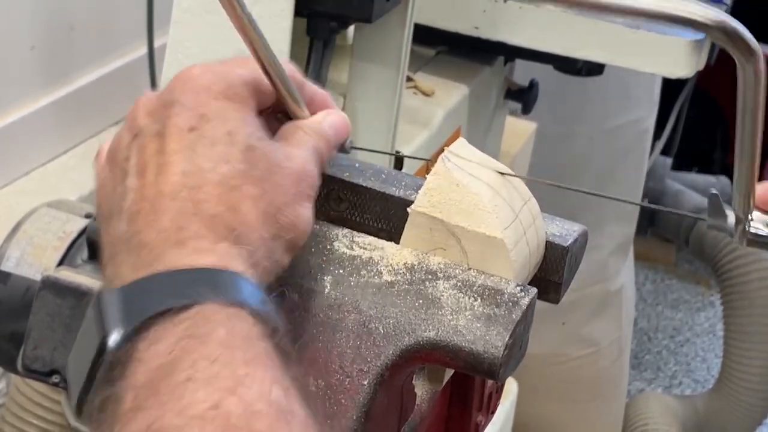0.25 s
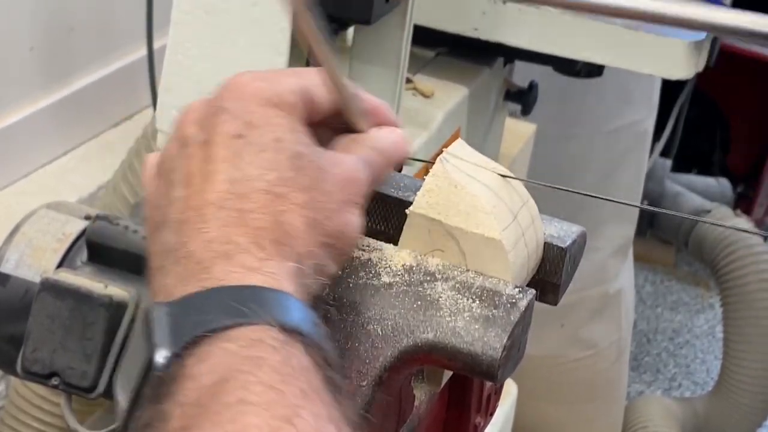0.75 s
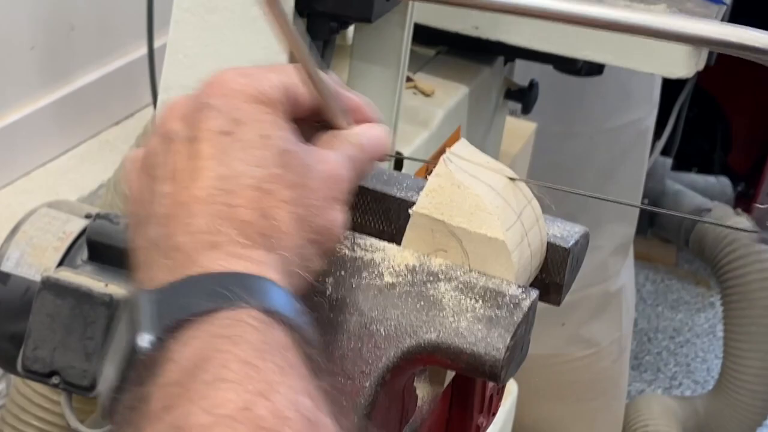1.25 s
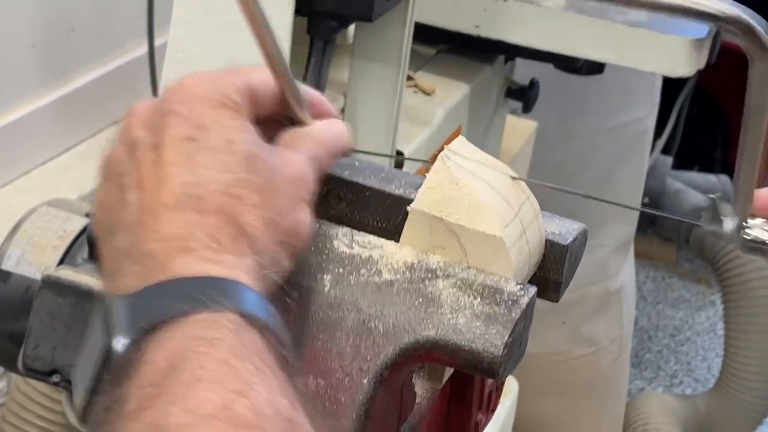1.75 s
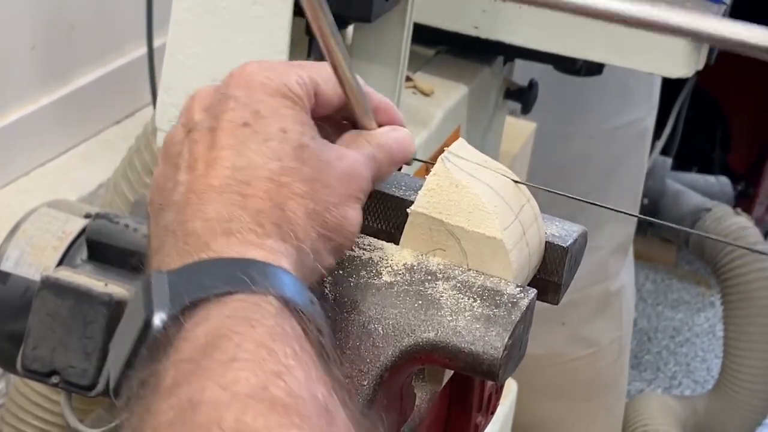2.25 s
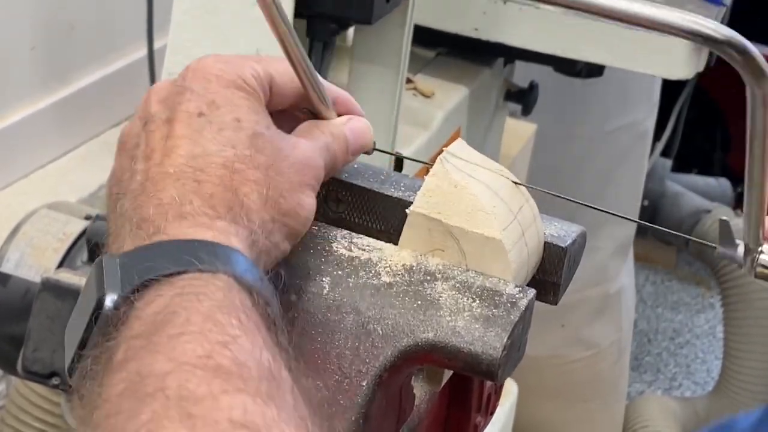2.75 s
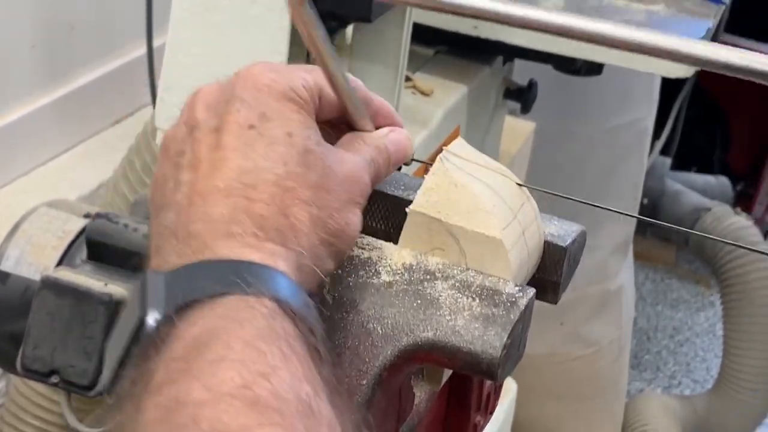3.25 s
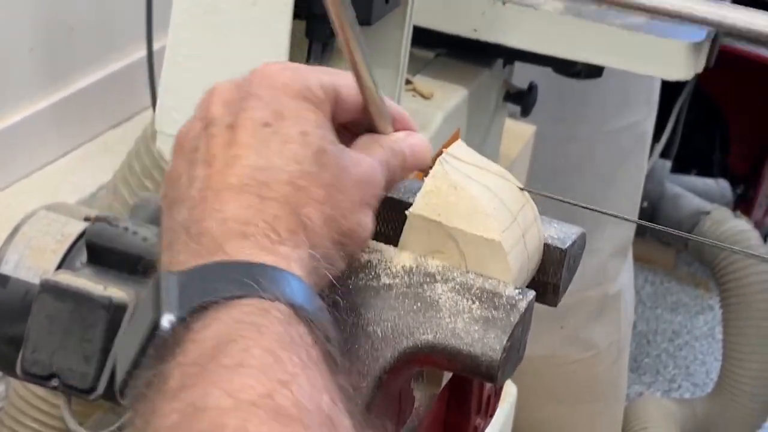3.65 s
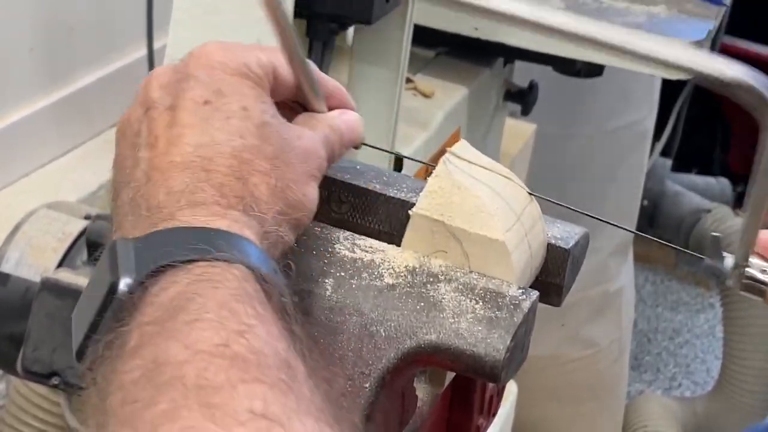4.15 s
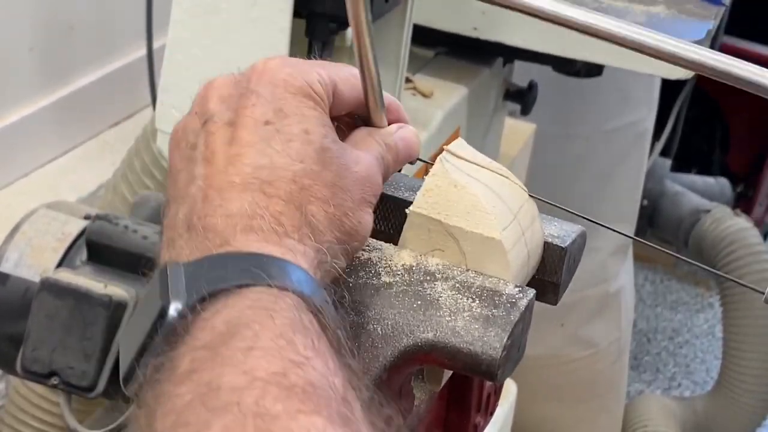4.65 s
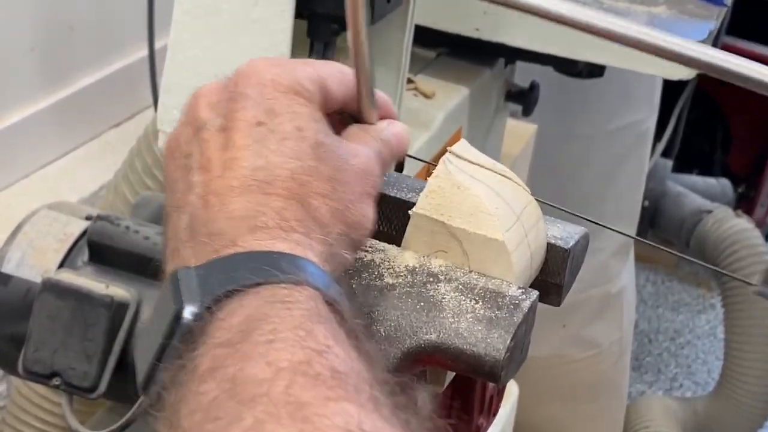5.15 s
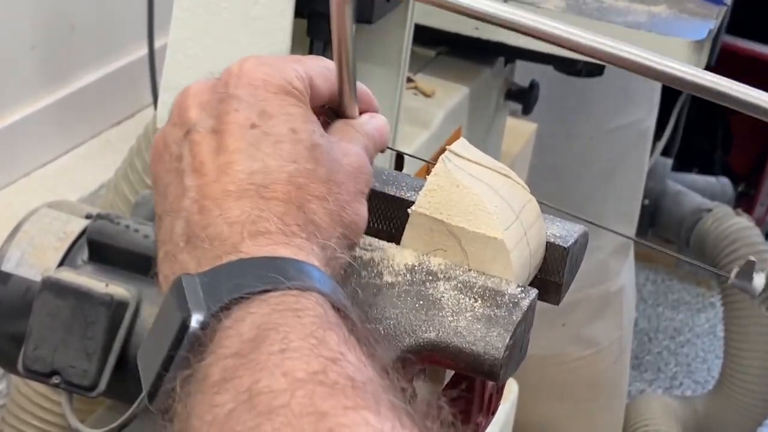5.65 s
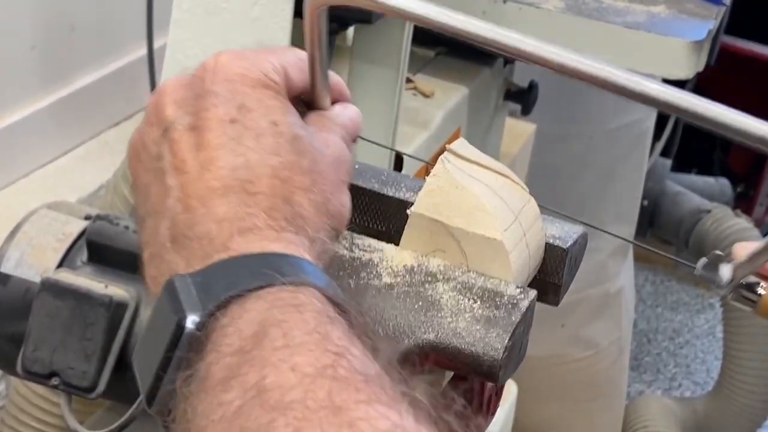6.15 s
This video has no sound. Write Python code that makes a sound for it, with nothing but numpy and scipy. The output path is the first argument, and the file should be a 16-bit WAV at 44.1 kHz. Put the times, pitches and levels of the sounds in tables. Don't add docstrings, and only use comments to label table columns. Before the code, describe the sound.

A hand coping saw rasps through softwood in quick, even back-and-forth strokes, ringing metallically, then slows into short, hesitant scrapes and snaps.

```python
import sys
import numpy as np
from scipy import signal
from scipy.fft import rfft, irfft, next_fast_len
from scipy.io import wavfile
from scipy.ndimage import uniform_filter1d, map_coordinates

SR = 44100
rng = np.random.default_rng(int(sys.argv[2]) if len(sys.argv) > 2 else 0)


def dump_mix(stems):
    frames = np.atleast_2d(stems).T
    limited = np.clip(frames, -1, 1)
    pcm = np.round(limited * 32767).astype(np.int16)
    wavfile.write(sys.argv[1], SR, pcm)


def makeup_ratio(level_db):
    decades = np.asarray(level_db, float) / 20
    return 10 ** decades


N = 282183

# (centre [s], length [s], first rate [Hz], last rate [Hz], level [dB])
TOOTH_ROWS = [(0.205, 0.066, 397.5, 113, -23), (0.513, 0.067, 419.6, 119, -25.5),
              (0.815, 0.069, 434.4, 104, -25.5), (1.115, 0.068, 435.5, 106.3, -19),
              (1.357, .03, 283, 315, -31), (1.421, 0.072, 441.2, 86, -19.5), (1.696, .035, 239, 335, -25),
              (1.752, 0.069, 425.5, 111, -29), (2.074, 0.04, 346, 240, -29.5), (2.179, .03, 238, 310, -28),
              (2.346, .025, 255, 300, -39), (2.399, 0.055, 380, 154, -31.5),
              (2.712, 0.052, 289.5, 251, -28.5), (3.007, .025, 268, 320, -33),
              (3.352, .03, 255, 310, -32.5), (3.669, 0.026, 256.5, 302, -30.5),
              (3.737, 0.062, 439.4, 135.4, -23), (4.026, 0.038, 270, 323, -27),
              (4.382, 0.043, 313, 279, -27.5), (5.571, 0.039, 293, 322, -37), (0.171, 0.026, 290, 387, -39),
              (0.32, 0.052, 282, 324, -32.5), (0.463, 0.028, 285, 323, -33),
              (0.764, 0.049, 339, 430, -31.5), (0.923, 0.058, 298, 318, -31.5),
              (1.061, 0.046, 291, 430, -37), (1.38, 0.027, 322, 442, -43), (1.476, 0.043, 272, 264, -40),
              (1.576, .04, 266, 293, -37), (1.726, 0.038, 295, 398, -32), (2.015, .03, 284, 320, -37),
              (2.239, .05, 255, 328, -39.5), (2.518, 0.045, 292, 258, -34), (3.046, .05, 332, 434, -39),
              (2.043, 0.047, 334, 435, -40), (3.392, 0.066, 297, 318, -37), (3.841, .025, 310, 317, -32),
              (3.884, 0.042, 325, 304, -32), (4.079, 0.049, 306, 310, -39), (5.016, .04, 253, 203, -32.5),
              (6.087, 0.046, 300, 281, -45)]


def unit(x):
    return x / np.sqrt(np.mean(x ** 2) + 1e-20)


def along(points, hz):
    f, v = np.transpose(points)
    return np.interp(np.log(hz + 1), np.log(f + 1), v)


def curves(rows):
    s, *cols = np.transpose(rows)
    return [np.interp(np.arange(N) / SR, s, c) for c in cols]


def wobble(rate_hz):
    coarse = np.arange(0, N + 16, 16)
    knots = rng.standard_normal(int(N * rate_hz / SR) + 4)
    return np.interp(np.arange(N), coarse, map_coordinates(knots, [coarse * rate_hz / SR]))


def filtered(x, response):
    m = next_fast_len(N + SR // 2)
    return irfft(rfft(x, m) * response(np.fft.rfftfreq(m, 1 / SR)), m)[..., :N]


def coloured(x, spectrum):
    return filtered(x, lambda hz: makeup_ratio(along(spectrum, hz)))


def ringing(x, modes):
    out = 0
    for k, (hz, width_hz, db) in enumerate(modes):
        r = np.exp(-np.pi * width_hz / SR)
        poles = [1, -2 * r * np.cos(2 * np.pi * hz / SR), r * r]
        out = out + (-1) ** k * makeup_ratio(db) * (1 - r) * signal.lfilter([1, 0, -1], poles, x)
    return out


def grit(grain_db, rate_hz):
    return unit(makeup_ratio(grain_db * wobble(rate_hz)) * rng.standard_normal(N))


def mottled(x, patchy_db):
    z = signal.stft(x, nperseg=512)[2]
    field = uniform_filter1d(rng.standard_normal(z.shape), size=7, axis=0)
    field = uniform_filter1d(field, size=6, axis=1)
    return signal.istft(z * makeup_ratio(patchy_db * unit(field)), nperseg=512)[1][:N]


def add(track, s, piece):
    part = track[round(s * SR):][:len(piece)]
    part += piece[:len(part)]


def strokes(column, peak, start_db, end_db, square):
    # (start [s], length [s], blade ring [dB], fibre hiss over it [dB], block [dB])
    pushes = [(0.139, 0.066, -32, -12, -39), (0.432, 0.082, -33, -10, -36.5),
              (0.728, 0.091, -29.5, -12.5, -35), (1.029, 0.088, -31, -12.5, -37.5),
              (1.343, 0.074, -28, -14, -33), (1.678, 0.072, -34, -9, -35), (1.995, 0.09, -34, -11, -39),
              (2.324, 0.083, -37, -7, -39), (2.658, 0.078, -42, -6.5, -37), (2.985, 0.093, -34, -9, -38.5),
              (3.33, 0.08, -37, -7.5, -36.5), (3.65, 0.09, -34, -7.5, -37.5),
              (3.993, 0.091, -38.5, -6, -36), (4.321, 0.099, -40, -4.5, -38.5)]
    pulls = [(-0.04, 0.094, -34.5, -11.5, -38), (0.252, 0.13, -40.5, -10, -39.5),
             (0.566, 0.1, -36.5, -12, -40), (0.867, 0.11, -37, -11, -38), (1.172, 0.11, -37.5, -10.5, -40),
             (1.487, 0.11, -38.5, -11, -37.5), (1.803, 0.12, -40.5, -10, -42),
             (2.138, 0.11, -39.5, -9, -38), (2.475, 0.11, -42, -7, -39.5), (2.802, 0.11, -43.5, -6, -41),
             (3.134, 0.12, -42.5, -5.5, -43.5), (3.471, 0.1, -40.5, -6, -39.5),
             (3.804, 0.11, -40, -6.5, -37.5), (4.143, 0.12, -43.5, -5.5, -41.5),
             (4.492, 0.092, -45.5, -1.5, -44)]
    drags = [(4.622, 0.083, -67, 9, -59), (4.808, 0.065, -51, 0.5, -49), (4.957, 0.099, -39.5, -7, -42),
             (5.112, 0.11, -50, -4, -48), (5.267, 0.087, -43.5, -6, -45.5),
             (5.402, 0.082, -49, -4.5, -53.5), (5.509, 0.1, -45.5, -8, -47.5),
             (5.644, 0.089, -53.5, -1.5, -54.5), (5.761, 0.12, -54, 0, -55.5),
             (5.919, 0.093, -54.5, -4.5, -59), (6.041, 0.094, -46.5, -6, -51.5),
             (6.163, 0.1, -53, -13, -71), (6.33, 0.21, -59, 6.5, -54.5)]
    t, power = np.arange(0, N + 64, 64) / SR, 0
    for row in pushes + pulls + drags:
        u = 2 * ((t - row[0]) / row[1] - peak)
        loss_db = np.where(u < 0, start_db, end_db) * np.abs(u) ** square
        power = power + makeup_ratio(column(row) - loss_db) ** 2
    return np.interp(np.arange(N) / SR, t, np.sqrt(power))


def catches():
    # (time [s], surge [dB])
    jumps = [(0.014, -1), (.281, 7), (0.336, 8), (0.439, 6), (.481, 3), (0.607, 0.5), (.709, 2), (.743, -1),
             (.904, 2), (1.024, 5), (1.063, 2), (1.194, -3), (1.278, 7), (1.345, -4), (1.368, 1),
             (1.547, 5), (1.682, 10.5), (1.828, 10.5), (1.875, 2), (1.987, 3), (2.038, 4.5), (2.182, 7),
             (2.331, 2), (2.364, 2.5), (2.501, 4), (2.827, -0.5), (3.017, -2), (3.327, 8), (3.464, 6.5),
             (3.656, -3), (3.695, 6.5), (3.815, 3), (4.007, 8), (4.324, 2), (4.522, -5), (4.814, 9),
             (5.022, -3), (5.262, 10), (5.53, -3), (5.81, -6), (6.046, 9), (6.19, 12)]
    hold_s, surge_s = 0.0027, 0.0057
    surge_db, u = np.zeros(N), np.arange(-SR // 20, SR // 10) / SR
    shape = np.where(u < 0, -0.7 * np.exp(-np.abs(u) / hold_s), np.exp(-np.abs(u) / surge_s))
    for s, db in jumps:
        start = max(s + u[0], 0)
        add(surge_db, start, db * shape[round((start - s - u[0]) * SR):])
    return makeup_ratio(surge_db)


def snaps():
    # (time [s], peak [dB], ring [dB], t60 [s])
    releases = [(4.407, -26, -30.5, 0.02), (4.6894, -54, -5, 0.025), (4.9721, -26, -16.5, 0.018),
                (4.983, -39.5, -15, 0.13), (5.4076, -49, -15.5, 0.052), (5.6343, -25, -24, 0.042),
                (5.9001, -35.5, -16, 0.056), (6.1726, -45, -9, 0.042), (6.315, -40.5, -8, 0.02),
                (6.352, -46, -9, 0.021), (6.39, -46, -12, 0.041)]
    hiss, ring = np.zeros((2, N))
    u = np.arange(SR // 8) / SR
    for s, db, ring_db, t60_s in releases:
        noise = np.diff(rng.standard_normal(len(u) + 1))
        snap = makeup_ratio(-60 * u / t60_s) * (1 - np.exp(-u / 0.00097)) * noise
        add(hiss, s, makeup_ratio(db - 6.5) * snap)
        add(ring, s, makeup_ratio(db + ring_db + 24.5) * snap)
    return hiss, ring


def blade():
    # (frequency [Hz], level [dB per Hz])
    fibre_spectrum = [(700, -120), (1300, -11.5), (1900, -2), (2800, -5.5), (4000, 0), (4600, -6),
                      (6000, -3), (8000, -3), (9300, -5.5), (11000, -1.5), (13000, -7), (16000, -3)]
    # (frequency [Hz], width [Hz], shallow cut [dB], deep cut [dB], frame turned [dB])
    frame_modes = [(865, 110, -32, -28.5, -30.5), (1128, 106, -33.5, -29.5, -62),
                   (1406, 25, -21.5, -19, -24), (1704, 33, -19.5, -25, -23), (2136, 177, -15.5, -18, -12.5),
                   (2210, 63, -9, -8, -6.5), (2282.4, 27.7, 0.5, -0.5, -2), (2322, 47.6, -1.5, -2, -2.5),
                   (2390, 73, -2, -3.5, -4), (2394, 166, -15, -21.5, -17.5),
                   (3108, 26, -16.5, -10.5, -15.5), (3346, 88, -12.5, -14, -16), (3462, 32, -8, -6, -23),
                   (3606, 75, -15.5, -13.5, -14), (4460, 52, -43, -33, -28), (5200, 86, -12.5, -12.5, -24),
                   (5390, 35, -12, -22, -12), (5513, 117, -26, -15, -22), (7010, 90, -25, -22.5, -23),
                   (7320, 48, -24, -18.5, -23), (7800, 190, -20, -31, -19.5),
                   (8660, 170, -29.5, -27.5, -31), (10480, 99, -36, -21, -31)]
    depths_s = [1.3, 1.9, 4.7, 5.1]
    # (time [s], half length [s], gain [dB])
    bows = [
        (5.566, 0.041, 2),
        (5.836, 0.032, 11.5),
        (6.07, 0.032, 12),
    ]
    tearing = grit(grain_db=0.65, rate_hz=740) * makeup_ratio(0.46 * wobble(40) + 0.58 * wobble(130)) * catches()
    ring = tearing * strokes(lambda row: row[2], peak=0.44, start_db=12.9, end_db=9.64, square=1.59)
    hiss = tearing * strokes(lambda row: row[2] + row[3] + 2, peak=0.55, start_db=8.9, end_db=11.1, square=1.58)
    snap_hiss, snap_ring = snaps()
    ring, hiss = ring + snap_ring, hiss + snap_hiss
    rasp = mottled(coloured(hiss, fibre_spectrum), patchy_db=1.33) / np.std(coloured(tearing, fibre_spectrum))

    t, rung = np.arange(N) / SR, 0
    bow_db = sum(db * np.exp(-((t - s) / half_s) ** 2) for s, half_s, db in bows)
    sway_db = np.interp(t, depths_s, [1.77, 1.7, 1.64, 2.4])
    for k, (hz, width_hz, shallow, deep, turned) in enumerate(frame_modes):
        depth_db = np.interp(t, depths_s, [shallow, deep, deep, turned])
        strength = makeup_ratio(22.5 + bow_db * (1500 < hz < 2250) + depth_db + sway_db * wobble(14))
        rung = rung + (-1) ** k * ringing(strength * ring, [(hz, width_hz, 0)])
    drift_s = .0004 * wobble(7)
    return rasp + map_coordinates(rung, [np.arange(N) + drift_s * SR], order=3)


def tooth_rows():
    # (frequency [Hz], width [Hz], level [dB])
    wood_modes = [(120, 23, -3), (242, 62, -11.5), (321, 109, -2), (420.5, 46, -5), (682, 58, -2),
                  (990, 500, -11)]
    spacing_share, scatter_db = .05, 1.3
    teeth, locked = np.zeros((2, N))
    uneven = wobble(150)
    for s, length_s, first_hz, last_hz, db in TOOTH_ROWS:
        u = np.linspace(0, 1, round(length_s * SR))
        spacing = 1 + spacing_share * uneven[round(s * SR):][:len(u)]
        rate_hz = (first_hz + (last_hz - first_hz) * u) * spacing
        turn = 2 * np.pi * np.cumsum(rate_hz) / SR + rng.uniform(0, 6.7)
        sharpness = np.clip(2.04 + 0.08 * (db + 17.5), .3, 3)
        pulses = np.exp(sharpness * (np.cos(turn) - 1))
        swell = makeup_ratio(db + 9.5) * np.sin(np.pi * u ** 1.185) ** 1.2
        bite = makeup_ratio(scatter_db * uneven[round(s * SR) // 2:][:len(u)])
        add(teeth, s - .54 * length_s, swell * bite * 0.34 * unit(pulses - pulses.mean()))
        add(locked, s - length_s / 2, np.sin(np.pi * u) ** 0.58)
    return ringing(teeth, wood_modes), np.minimum(locked, 1)


def stalls():
    return [(s + length_s / 2, db) for s, length_s, _, last_hz, db in TOOTH_ROWS if last_hz < 160]


def drumming(locked):
    # (frequency [Hz], level [dB per Hz])
    block_spectrum = [(88, -51), (150, -22), (222, -13.5), (258, 1), (290, -4.5), (322, 0), (400, -12),
                      (470, -29), (527, -24), (592, -23.5), (691, -23.5), (777, -35), (982, -31),
                      (1090, -26), (1200, -52), (1300, -30), (1690, -45), (2860, -120)]
    load = strokes(lambda row: row[4], peak=0.47, start_db=15.5, end_db=3.4, square=1.8)
    rumble, u = np.zeros(N), np.arange(SR // 5) / SR
    for s, db in stalls():
        add(rumble, s - .02, makeup_ratio(db - 11.5 - 60 * u / .3) * np.minimum(u / 0.025, 1))
    contact = grit(grain_db=3.0, rate_hz=90)
    force = np.hypot(load * makeup_ratio(-3 - 2.1 * locked), rumble)
    return coloured(force * contact, block_spectrum) / np.std(coloured(contact, block_spectrum))


def bench():
    # (frequency [Hz], level [dB per Hz])
    bench_spectrum = [(15, -61), (25, -24), (100, -2), (118, 1.5), (156, -15.5), (190, -8), (250, -19),
                      (420, -120)]
    # (time [s], bench over block [dB])
    arm_weight = [(0, -8), (2, -7), (3, -6.5), (4.6, -6.5), (4.9, 4.5), (5.4, 2.5), (5.7, 4), (6.4, -4.5)]
    # (time [s], peak [dB])
    knocks = [(2.988, -33), (3.993, -32.5), (4.825, -37.5), (4.97, -41), (6.066, -42), (5.122, -25.5),
              (5.184, -24.5), (5.25, -26), (5.312, -27), (5.453, -29.5), (5.517, -29.5), (5.562, -38)]
    lean = strokes(lambda row: row[4], peak=0.68, start_db=4.5, end_db=4, square=1.7)
    lean = lean * makeup_ratio(curves(arm_weight)[0])
    sway = grit(grain_db=1.5, rate_hz=65)
    rock = coloured(lean * sway, bench_spectrum) / np.std(coloured(sway, bench_spectrum))
    tugs, u = np.zeros(N), np.arange(SR // 8) / SR
    for s, db in knocks + [(s - .021, db - 2) for s, db in stalls()]:
        thump = (1 - np.exp(-u / 0.0086)) * np.sin(2 * np.pi * 113 * u)
        add(tugs, s - .004, makeup_ratio(db - 60 * u / 0.11) * thump)
    return rock + makeup_ratio(1.0) * tugs


def handle():
    # (start [s], length [s], pitch [Hz], level [dB])
    squeaks = [
        (.105, .045, 845.5, -53),
        (4.643, .047, 846, -57),
        (4.685, .11, 846, -66),
        (5.285, .035, 846, -62),
        (5.775, .1, 843, -66),
        (6.07, .11, 843, -65),
    ]
    # (multiple of the pitch [1], level [dB])
    orders = [(1, -15), (2, -19), (4, -21), (8, -11), (9, 0), (10, -13), (12, -16)]
    out = np.zeros(N)
    for s, length_s, hz, db in squeaks:
        u = np.arange(round(length_s * SR)) / SR
        wander = 0.0016 * np.cumsum(rng.standard_normal(len(u))) / np.sqrt(len(u))
        turn = 2 * np.pi * np.cumsum(hz * (1 + wander)) / SR
        tone = 0
        for k, level_db in orders:
            flutter_db = 3.0 * np.sin(turn / rng.uniform(14, 37) + k)
            tone = tone + makeup_ratio(level_db + flutter_db) * np.sin(k * turn)
        swell = np.sin(np.pi * u / length_s) ** 0.18 * makeup_ratio(1.2 * np.sin(turn / rng.uniform(37, 43)))
        add(out, s, makeup_ratio(db) * swell * tone)
    return out


def shop(x, stretch):
    # (frequency [Hz], t60 [s])
    decay = [(100, 0.43), (1000, 0.67), (4000, 0.22), (12000, 0.033)]
    hz, t, z = signal.stft(rng.standard_normal(SR // 2), SR, nperseg=256)
    t60_s = stretch * along(decay, hz)[:, None]
    tail = signal.istft(z * makeup_ratio(-60 * t / t60_s), SR, nperseg=256)[1]
    return signal.fftconvolve(x, tail / np.linalg.norm(tail))[:N]


def rustle():
    # (frequency [Hz], level [dB per Hz])
    air_spectrum = [(20, -42), (50, -0.5), (110, -1), (300, -10), (600, -17.5), (1200, -26.5), (2300, -21),
                    (5000, -32), (10000, -31.5), (16000, -41)]
    # (time [s], level [dB])
    hush_level = [(4.4, -80), (4.67, -70.5), (4.77, -76), (4.9, -72.5), (5.2, -76.5), (5.46, -71),
                  (5.58, -92), (5.73, -81), (5.88, -78), (6.02, -82), (6.15, -74), (6.25, -81), (6.34, -85),
                  (6.37, -74), (6.4, -66)]
    air = mottled(coloured(rng.standard_normal(N), air_spectrum), patchy_db=3.0)
    return makeup_ratio(curves(hush_level)[0] + 17.0) * unit(air)


def ports(x):
    # (frequency [Hz], share [0-1])
    tied_share = [(60, .93), (290, .9), (640, .55), (1410, .6), (3100, .6), (6820, .8), (15000, .7)]
    # (frequency [Hz], phase [rad])
    side_lead = [(60, .4), (300, .75), (640, .6), (1300, 1.2), (2000, 1.55), (16000, 1.57)]
    # (frequency [Hz], level [dB])
    side_level = [(60, -13), (150, -11), (300, -12), (600, 0), (1300, -12), (1800, -24), (2400, -17),
                  (3600, -11), (4500, -26), (5300, -11), (6100, -12), (6400, -32), (7700, -32), (7900, 2),
                  (16000, 3)]
    # (frequency [Hz], level [dB])
    side_gaps = [(10250, 0), (10450, -30), (11700, -30), (11900, 0), (15000, 0), (15300, -30)]

    def paths(hz):
        tied = np.clip(along(tied_share, hz), 0, 1)
        gain = makeup_ratio(along(side_level, hz) + along(side_gaps, hz))
        return gain * np.array([tied * np.exp(1j * along(side_lead, hz)), np.sqrt(1 - tied ** 2)])

    scattered = unit(wobble(18)) * shop(x, stretch=0.41)
    side = filtered(np.array([x, scattered]), paths).sum(axis=0)
    return np.array([x + side, x - side])


def scene():
    rows, locked = tooth_rows()
    saw = blade() + rows + drumming(locked) + bench()
    squeak = handle()
    room = makeup_ratio(-14.5) * shop(saw, stretch=0.67) + makeup_ratio(5) * shop(squeak, stretch=0.26)
    return ports(saw + squeak + rustle() + room)


def roll_off(x):
    return signal.sosfilt(signal.butter(12, 16970, fs=SR, output="sos"), x)


def record(dry):
    # (frequency [Hz], level [dB])
    port_notch = [(12300, 0), (13080, -6), (13130, -26), (13770, -26), (13820, -8), (14700, -2),
                  (16000, -4)]
    mid = coloured(dry.mean(axis=0), port_notch)
    side = (dry[0] - dry[1]) / 2
    mix = filtered(np.array([mid + side, mid - side]), lambda hz: hz < 15800)
    return roll_off(mix)


dry = scene()
out = record(dry)
dump_mix(out)
```